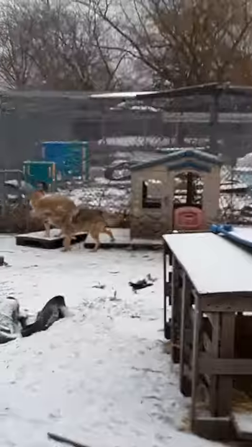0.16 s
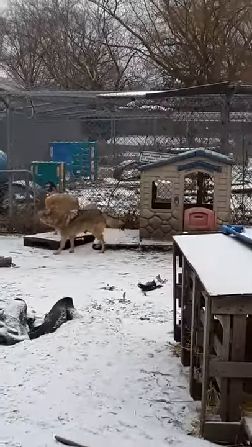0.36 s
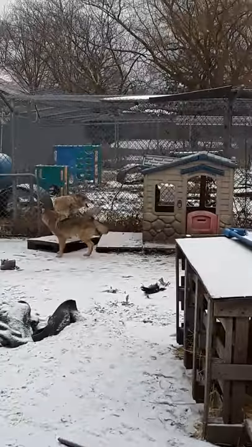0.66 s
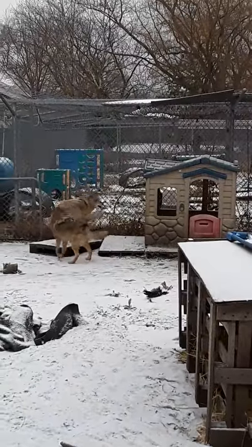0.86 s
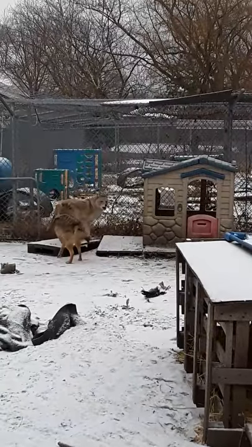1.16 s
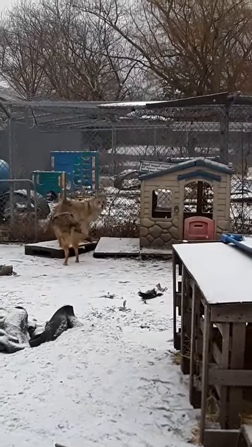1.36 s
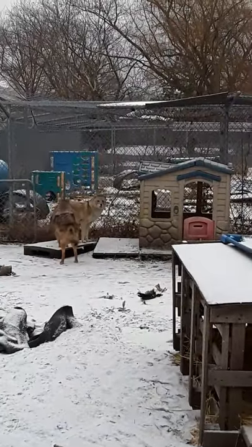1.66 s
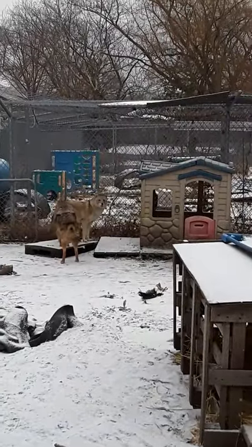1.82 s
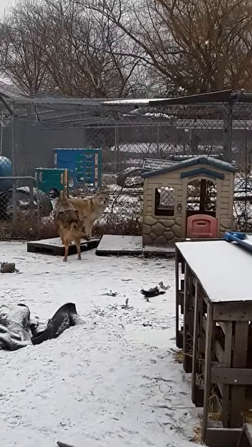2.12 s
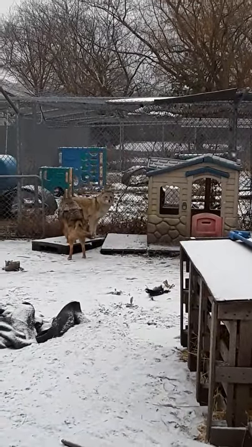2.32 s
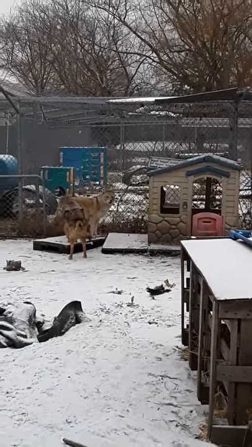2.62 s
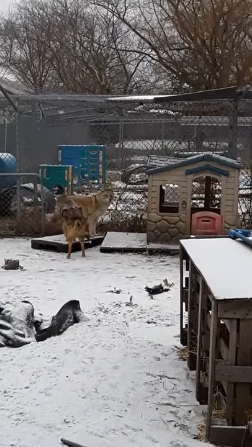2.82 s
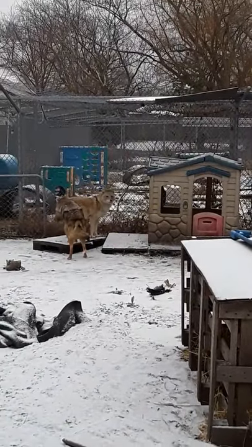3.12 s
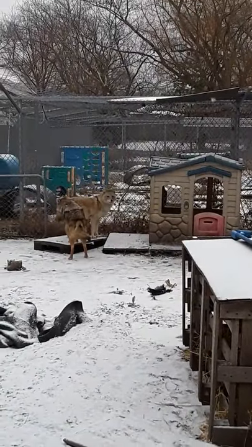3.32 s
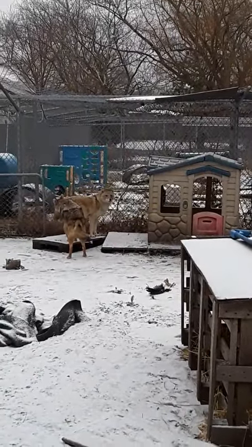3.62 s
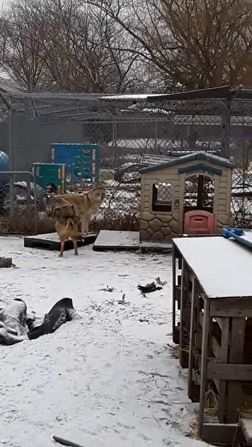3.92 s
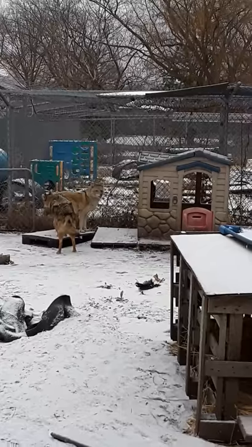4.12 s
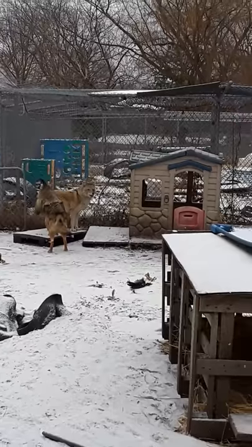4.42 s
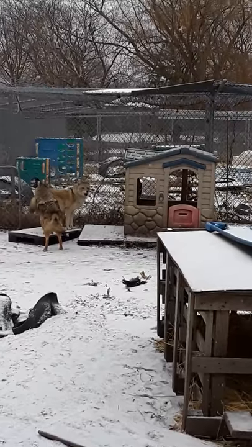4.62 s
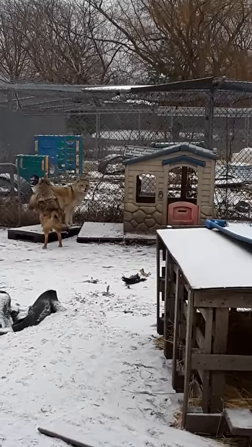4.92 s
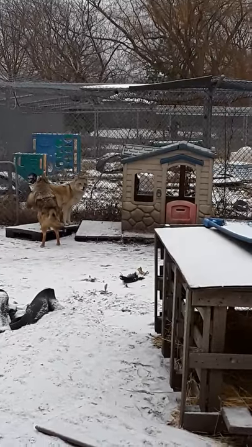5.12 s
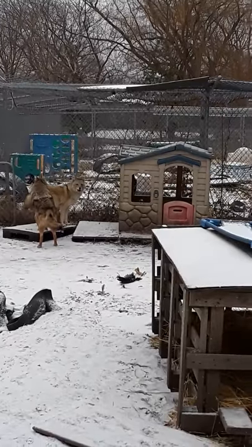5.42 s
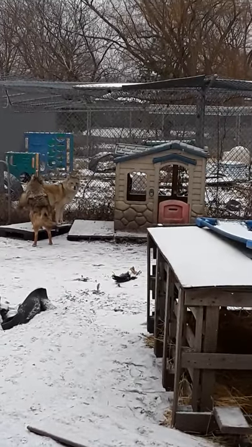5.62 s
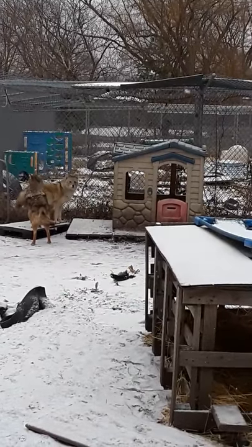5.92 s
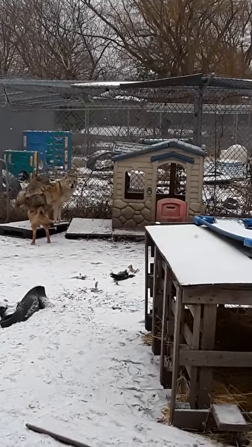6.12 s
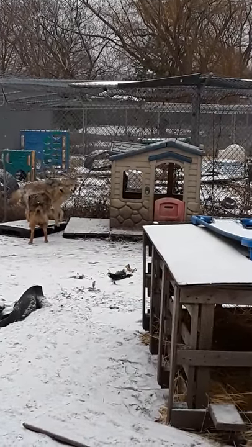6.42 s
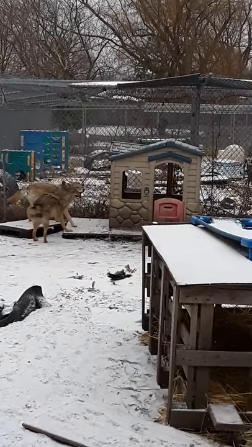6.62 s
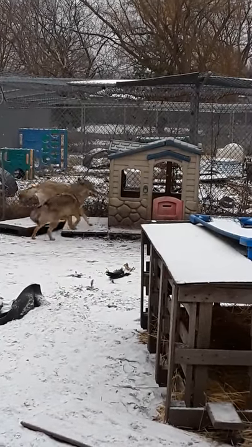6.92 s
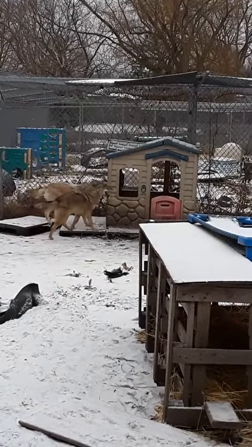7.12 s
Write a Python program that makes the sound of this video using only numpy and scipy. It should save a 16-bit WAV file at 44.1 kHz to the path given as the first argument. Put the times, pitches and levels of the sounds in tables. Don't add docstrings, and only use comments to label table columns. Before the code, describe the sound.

Excited wild canines yelp and whimper over each other outdoors, easing into weak whines before loud climbing yips return, with smeared echo and soft thumps.

```python
import sys
import numpy as np
from scipy import signal
from scipy.fft import rfft, irfft, next_fast_len
from scipy.io import wavfile
from scipy.ndimage import uniform_filter1d, map_coordinates

SR = 44100
rng = np.random.default_rng(int(sys.argv[2]) if len(sys.argv) > 2 else 0)


def bounce(signal):
    frames = np.transpose(np.atleast_2d(signal))
    limited = np.clip(frames, -1, 1)
    pcm = np.round(limited * 32767).astype(np.int16)
    wavfile.write(sys.argv[1], SR, pcm)


def attenuation_scalar(level_db):
    decades = np.asarray(level_db, float) / 20
    return 10 ** decades


N = 320166

# start_s, length_s, first_pitch_hz, last_pitch_hz, fundamental_db
OPEN = [
    (0, 0.037, 813, 792, -29.5),
    (6.01, 0.18, 650, 609.5, -38),
    (6.91, 0.09, 874, 883, -25),
    (7.21, 0.097, 666, 759, -26),
]
SHRILL = [
    (1.085, 0.042, 673, 761.3, -25.5),
    (4.625, 0.035, 914, 1022, -35),
    (5.755, 0.2, 624, 621.5, -52),
]
NASAL = [
    (1.32, 0.12, 822, 827.7, -28.5),
    (2.37, 0.092, 701, 668, -34.5),
]
ROUND = [
    (.11, 0.12, 729, 790.5, -24),
    (1.12, 0.11, 770.6, 860.4, -23.5),
    (1.24, 0.044, 831, 757, -26),
    (1.33, 0.11, 839, 932, -28.5),
    (7.19, 0.1, 1030, 1006, -29.5),
]
YELPS = [
    (2.46, 0.037, 1112, 1010, -39),
    (2.66, .04, 1153, 1060, -35.5),
]
BARKS = [
    (.745, 0.049, 892, 852, -26),
]
RASPS = [
    (.11, 0.094, 715, 807, -48),
    (.82, 0.064, 730, 799, -33),
    (.86, .11, 703, 670, -35.5),
]
PINCHED = [
    (.45, 0.041, 563, 710, -29.5),
    (.93, 0.15, 858, 826, -36.5),
    (2.72, 0.091, 623, 671, -37),
]
CRACKED = [
    (1.115, 0.031, 757, 630, -27),
]
CREAKS = [
    (4.505, .155, 681.7, 677, -25),
]
FAR_ROUND = [
    (.58, 0.18, 662, 648, -37),
    (2.81, 0.065, 633, 725, -33.5),
]
FAR_THIN = [
    (1.55, 0.15, 538.6, 509, -49),
    (1.67, 0.071, 535.6, 637, -37),
    (2.9, 0.16, 662.4, 643, -45.5),
    (3.28, 0.1, 760, 731, -45.5),
    (7.055, 0.095, 591, 700.6, -31),
]
FAR_MOANS = [
    (3.725, .13, 496.4, 500, -47.5),
]
SQUEALS = [
    (2.485, 0.044, 938, 884, -30),
    (2.685, 0.026, 1055, 950, -37.5),
    (5.855, .05, 883, 933, -36),
]


def yips():
    # hz, level_db under the 3rd overtone
    mouth = [(2150, -4), (2600, -13), (3100, -12), (3500, -20), (5000, -53.5)]
    # hz, level_db
    edge = [(3400, 9), (4100, 8), (4900, 0), (6000, -6), (7600, 2.5), (9500, -13.5), (13000, -9),
            (15500, -26)]
    chaos = .04
    spread = 0.076
    out = np.zeros((2, N + SR))
    k = np.arange(1, 19)[:, None]
    for rows, (second_db, third_db, high_db, quality) in calls():
        start, hz, gain = breath(rows, fade=.0095)
        size = len(hz)
        hz = uniform_filter1d(hz, size=400, mode="nearest")
        hoarse, split = np.clip(quality, .02, .95), np.clip(-quality, 0, 3)
        scatter = 0.007 + chaos * hoarse ** 2
        phase = 2 * np.pi * np.cumsum(hz * (1 + scatter * wobble(size, rate_hz=69.15))) / SR
        level = attenuation_scalar(third_db + along(mouth, k * hz) - 3 * (k - 4.5))
        level[:3] = attenuation_scalar([[0], [second_db], [third_db]])
        effort = (gain / gain.max()) ** .5
        patches = attenuation_scalar(6.3 * np.tanh(flutter(len(k), size, rate_hz=30)))
        high = attenuation_scalar(high_db + along(edge, k * hz)) * effort * patches * (k * hz < SR / 2)
        level[3:] += high[3:]
        hidden = np.clip(-np.log10(gain.max() * level.max()) - .6, 0, 1)
        level *= attenuation_scalar(6.85 * hidden * np.tanh(flutter(len(k), size, rate_hz=45)))
        low_share = (hoarse + 0.091 * split) * np.minimum(k / 2, 1)
        high_share = (0.02 + 0.5 * (hoarse + split) + 0.035 * hidden) * np.maximum(k - 4, 0)
        share = np.clip(low_share + high_share, 0, .95)
        turn = k * phase + 2 * np.pi * rng.random(k.shape)
        noise = smear(len(k), size) * np.sin(turn) + smear(len(k), size) * np.cos(turn)
        lines = level * (np.sqrt(1 - share) * np.sin(turn) + np.sqrt(share / 2) * noise)
        half_level = (split + 1.3 * hoarse ** 2) * np.sqrt(level[:6] * level[1:7])
        halves = half_level * np.sin(turn[:6] + phase / 2)
        halves *= 1 + .5 * flutter(len(halves), size, rate_hz=200)
        call = gain * (lines.sum(axis=0) + halves.sum(axis=0))
        lean = np.clip(spread * k[:, 0], 0, .6) * rng.uniform(-0.84, 1, size=len(k))
        side = gain * (lean @ lines)
        for port, late, sign in zip(out, rng.integers(0, 2, size=2), (1, -1)):
            port[start + late:][:size] += call + sign * side
    return out[:, :N]


def calls():
    # calls, (second_db, third_db, high_overtones_db, quality),
    # (attack_s, loss_by_end_db); quality above 0 is the hoarse share, below 0 period doubling
    kinds = [(OPEN, (-6.5, -3.5, -37, 0.33), (0.049, 13)), (SHRILL, (10.5, 5, -32.5, -0.1), (0.02, 8.9)),
             (NASAL, (2.5, -4.5, -45, 0.25), (.038, 8.6)), (ROUND, (-11, -15.5, -39.5, -0.49),
             (.043, 11.7)), (YELPS, (-5.5, -15, -40, -0.1), (0.021, 9.3)), (BARKS, (-6.5, -7.5, -37.5, 0.5),
             (.028, 2)), (RASPS, (3.5, 7, -28.5, 0.53), (.032, 5.6)), (PINCHED, (-2, 6, -38, 0.12),
             (0.029, 6.8)), (CRACKED, (-2.5, 7.5, -31, -0.8), (0.02, 10)),
             (CREAKS, (-6.5, -3.5, -46, -0.94), (0.014, 19)), (FAR_ROUND, (-7, -1.5, -56, 0.32),
             (0.031, 9.3)), (FAR_THIN, (1, 2.5, -50, 0.3), (.042, 5)), (FAR_MOANS, (3, -2, -66, .8),
             (.06, 5)), (SQUEALS, (7, 0.5, -28.5, 0.19), (0.014, 10))]
    # start_s, length_s, pitch_hz, fundamental_db
    dips = [
        (3.491, .06, 829, -34.5),
    ]
    dip_to, dip_ends_db, dip_voice = .96, 8, (10.5, 4, -27, 0.04)
    # (time_s, pitch_hz, fundamental_db)
    phrases = [
        ([(.48, 655, -37), (.505, 655, -32), (.53, 645, -35), (.57, 600, -40)], (-3, 2, -36.5, -1.1)),
        ([(4.45, 492, -34.8), (4.475, 593, -19), (4.51, 722, -31.5)], (-10.5, -9, -56, .12)),
        ([(5.425, 933, -39.5), (5.46, 981, -32), (5.495, 960, -45.5)], (13.5, 8.5, -18, .02)),
        ([(6.0, 728, -41), (6.03, 913, -24), (6.06, 930, -24.5), (6.1, 934, -33.5)], (-1.5, -7.5, -62, .04)),
        ([(6.205, 652, -42), (6.225, 740, -30), (6.245, 800, -17), (6.27, 838, -14), (6.293, 862, -16)], (-.4, -2, -33, .02)),
        ([(6.405, 775, -28), (6.422, 900, -17), (6.44, 1060, -22), (6.47, 1030, -23.5), (6.54, 1015, -24)], (-4, -1.3, -43, .08)),
        ([(7.1, 698, -34), (7.15, 855, -18.5), (7.19, 889, -27)], (-1, -14.5, -40, .1)),
               ([(.29, 940, -33.5), (.33, 946, -28.5), (.37, 953, -45), (.44, 947, -52)], (10.5, -5, -50, -.08)),
        ([(.675, 762, -35), (.71, 795, -19.5), (.75, 859, -23)], (3, -7, -39.5, .15)),
        ([(2.205, 582, -38), (2.23, 682, -25), (2.26, 718, -26.5), (2.36, 704, -36)], (-2.5, -3.5, -48, .14)),
        ([(4.465, 790, -45), (4.485, 770, -26), (4.515, 765, -28), (4.54, 720, -38)], (-2, -12, -35, .1)),
        ([(5.635, 705, -39.5), (5.68, 837, -21), (5.73, 883, -35), (5.76, 867, -58)], (-10.5, -7, -56, .25)),
        ([(6.63, 644, -31), (6.655, 740, -24), (6.685, 785, -22)], (4, 3.5, -40, .12)),
        ([(6.835, 800, -32), (6.865, 870, -23), (6.9, 850, -24), (6.93, 850, -36)], (-3, -1, -33.5, .9)),
               ([(.17, 451.3, -43.5), (.2, 488, -40.5), (.23, 494.5, -39), (.27, 462, -46.5)],
              (3.5, 6, -28.5, 0.2)), ([(.04, 539.5, -50.5), (.075, 677, -41.5), (.11, 693, -43.5)],
              (10.5, 1, -34, 0.3)), ([(4.655, 1025, -38.5), (4.68, 1220, -34.5), (4.71, 1215, -41)],
              (-5.5, -16, -25, 0.66)), ([(.19, 690, -36.5), (.26, 615.7, -31), (.35, 651, -36.5),
              (.44, 690, -39)], (-5.5, -12, -37, 0.1)), ([(1.74, 715, -34), (1.765, 778, -24),
              (1.8, 782, -32)], (4, -4, -33, .12)), ([(2.545, 619.5, -39.5), (2.58, 691, -35),
              (2.62, 705, -35.5), (2.66, 701, -43)], (2.5, 2, -39.5, 0.24)), ([(4.29, 987, -52),
              (4.32, 1034, -44), (4.38, 1079, -52)], (-10, -9.5, -60, 0.5)), ([(5.11, 840, -45),
              (5.13, 815, -42), (5.148, 768, -43), (5.17, 760, -46)], (7, 1, -36, .08)),
              ([(6.84, 692.6, -37), (6.87, 634.5, -31.5), (6.92, 616, -37.5)], (9, 2, -46, 0.4)),
              ([(5.35, 490, -63.5), (5.385, 576, -57.5), (5.43, 561, -50)], (8, -0.5, -60, -0.1)),
              ([(5.5, 561, -46), (5.54, 553, -46), (5.58, 543, -49)], (-11, -14, -58, 0.2)),
               ([(6.678, 800, -27), (6.692, 872, -19), (6.73, 882, -19), (6.77, 890, -34)],
                (-10, -16, -36, -.7)), ([(6.675, 650, -30), (6.692, 735, -26), (6.73, 730, -28),
                (6.77, 725, -38)], (-4, 6, -40, .35)), ([(1.265, 690, -37), (1.3, 785, -30),
                (1.325, 800, -29), (1.35, 810, -39)], (8, 1, -35, -.5)), ([(.845, 1180, -33),
                (.87, 1090, -26), (.915, 930, -28)], (-9, -11, -40, .4)), ([(6.542, 985, -27),
                (6.555, 930, -25), (6.575, 960, -36)], (-4, 0, -50, .15)), ([(3.53, 830, -36),
                (3.542, 925, -34), (3.565, 900, -42)], (5, 0, -25, .45)), ([(5.475, 965, -46),
                (5.49, 960, -42), (5.51, 900, -50)], (6, 2, -14, .7)), ([(2.06, 500, -58), (2.13, 530, -49),
                (2.2, 530, -50)], (0, 2, -60, .12)), ([(4.935, 470, -54), (4.965, 500, -48),
                (5.03, 505, -50), (5.09, 500, -55)], (3, 9, -52, .08)), ([(6.297, 885, -17),
                (6.308, 888, -14), (6.322, 880, -25)], (-13, -20, -40, .08)), ([(6.805, 700, -50),
                (6.832, 760, -33), (6.848, 868, -18), (6.875, 862, -23)], (-4, -12, -45, .15)),
                ([(3.09, 665, -41), (3.12, 700, -35), (3.17, 722, -36), (3.215, 720, -41)],
                (3.5, -3, -58, .12)), ([(3.265, 700, -41), (3.3, 785, -33), (3.35, 800, -35),
                (3.4, 770, -43), (3.455, 780, -47)], (4, -4, -58, .15))]
    # time_s, pitch_hz, fundamental_db
    whine = [
        (3.82, 479, -56),
        (3.88, 503, -43.5),
        (3.93, 561.7, -38.5),
        (4.05, 557.2, -42),
        (4.33, 528, -41),
        (4.39, 492.5, -44),
        (4.44, 413, -46),
    ]
    # second_db, third_db, high_overtones_db, quality
    whine_voice = (-4, -9, -66, .03)
    for rows, voice, (attack, loss_db) in kinds:
        for s, length, first_hz, last_hz, db in rows:
            rise = np.clip(attack, .005, 0.61 * length)
            done = .85 if last_hz > first_hz else rise / length
            start_db = db - 0.5 - 33.5 * max(np.log2(last_hz / first_hz), 0)
            yield [(s, first_hz, start_db),
                   (s + rise, first_hz + done * (last_hz - first_hz), db),
                   (s + length, last_hz, db - loss_db)], voice
    for s, length, hz, db in dips:
        yield [(s, hz, db - dip_ends_db),
               (s + length / 2, dip_to * hz, db),
               (s + length, dip_to * hz, db - dip_ends_db)], dip_voice
    yield from phrases
    yield whine, whine_voice


def breath(rows, fade):
    s, hz, db = np.transpose(rows)
    start = max(int((s[0] - fade) * SR), 0)
    t = np.arange(start, int((s[-1] + fade) * SR)) / SR
    nearest_end = np.minimum(t - s[0], s[-1] - t)
    ends = np.sin(np.pi / 2 * np.clip(nearest_end / (2 * fade) + .5, 0, 1)) ** 2
    return start, np.interp(t, s, hz), attenuation_scalar(np.interp(t, s, db)) * ends * np.sqrt(2)


def smear(count, size):
    return np.vstack([flutter(4, size, rate_hz=420), flutter(count - 4, size, rate_hz=700)])


def whistles():
    out = np.zeros(N + SR)
    for rows, octave_db in whistle_shapes():
        start, hz, gain = breath(rows, fade=0.00085)
        unsteady = 1 + .011 * wobble(len(hz), rate_hz=67)
        smooth_hz = uniform_filter1d(hz, size=500, mode="nearest")
        phase = 2 * np.pi * np.cumsum(smooth_hz * unsteady) / SR
        gain = gain * attenuation_scalar(5.5 * wobble(len(hz), rate_hz=85.0))
        third = attenuation_scalar(-19.0) * np.sin(3 * phase) * (hz < SR / 6)
        out[start:][:len(hz)] += gain * (np.sin(phase) + attenuation_scalar(octave_db) * (np.sin(2 * phase) + third))
    return out[:N]


def whistle_shapes():
    # start_s, length_s, top_pitch_hz, level_db, octave_db
    flicks = [(0.858, .02, 5060, -66, 5), (1.219, 0.018, 4600, -46.5, -7), (2.141, .03, 5530, -65, -17.5),
              (2.653, 0.035, 5340, -57, -4), (4.453, 0.013, 5380, -62, -25), (4.736, 0.017, 4200, -50, -19),
              (5.093, 0.016, 5630, -72, -20), (5.388, 0.027, 5430, -53.5, -29),
              (5.53, 0.012, 4480, -44, -28), (5.842, 0.02, 5200, -59, -6.5), (6.194, 0.012, 5230, -56, -24)]
    # start_s, length_s, top_pitch_hz, level_db, octave_db
    arches = [
        (1.903, 0.06, 4120, -69.5, 4),
        (2.878, 0.135, 5170, -60.5, -6.5),
        (3.66, 0.036, 5010, -89, 11),
        (3.925, .11, 5840, -61.5, -25),
        (5.603, 0.11, 4750, -60.5, -5),
    ]
    # start_s, length_s, top_pitch_hz, level_db, octave_db
    sighs = [
        (4.2, 0.1175, 5740, -63, -31.5),
    ]
    # start_s, length_s, first_hz, last_hz, level_db
    slides = [
        (4.337, 0.046, 6600, 6534, -64),
        (4.661, 0.057, 5380, 4520, -53),
        (2.17, 0.05, 5700, 4400, -64),
        (5.135, .025, 5400, 5350, -61),
        (5.16, .016, 5300, 4850, -61),
        (5.893, .055, 5100, 4800, -57),
        (6.9, 0.044, 5080, 4740, -51),
        (5.757, .08, 6550, 7200, -80),
        (6.356, 0.06, 8060, 8300, -52),
    ]
    # start_s, length_s, first_hz, last_hz, level_db
    hums = [
        (2.25, 0.093, 4400, 4550, -59),
        (2.377, 0.1, 4800, 4830, -67),
        (2.56, 0.096, 4800, 4900, -62),
        (2.74, 0.093, 4600, 4750, -68),
        (3.123, 0.083, 5140, 4970, -65.5),
        (3.292, 0.094, 4820, 4880, -68.5),
    ]
    arch_from, arch_shoulder, arch_to, arch_ends_db = .88, 0.95, .88, 10
    for s, length, hz, db, octave_db in flicks:
        yield [(s, .9 * hz, db - 9), (s + length, hz, db)], octave_db
    for s, length, hz, db, octave_db in arches:
        yield [(s, arch_from * hz, db - arch_ends_db),
               (s + 0.33 * length, arch_shoulder * hz, db - 4.5),
               (s + 0.74 * length, hz, db),
               (s + length, arch_to * hz, db - arch_ends_db)], octave_db
    for s, length, hz, db, octave_db in sighs:
        yield [(s, arch_shoulder ** 2 * hz, db - 6),
               (s + 0.35 * length, hz, db),
               (s + length, arch_to * hz, db - 7.0)], octave_db
    for s, length, first_hz, last_hz, db in slides:
        yield [(s, first_hz, db), (s + length, last_hz, db - 6)], -3.5
    for s, length, first_hz, last_hz, db in hums:
        for detune in (.97, 1, 1.035):
            yield [(s, detune * first_hz, db - 13),
                   (s + length / 3, detune * (first_hz + last_hz) / 2, db - 6),
                   (s + length, detune * last_hz, db - 12)], -40


def echo(x, unlike):
    # hz, decay_s
    yard = [(1200, .8), (3000, .38), (5000, .3), (8000, .25), (12000, .1)]
    out = np.zeros((2, N))
    slot = np.arange(N) / (SR // 4)
    for j in range(3):
        hz, t, z = signal.stft(rng.standard_normal((2, SR)), SR, nperseg=256)
        decay = attenuation_scalar(-60 * t / along(yard, hz)[:, None])
        a, b = signal.istft(z * decay, SR, nperseg=256)[1]
        tail = np.array([a + unlike * b, a - unlike * b]) / np.linalg.norm(a)
        share = np.abs(np.cos(np.pi * (slot - j) / 3)) ** 3
        delayed = np.pad(x * share, (500, 0))[None]
        out += signal.fftconvolve(delayed, tail, axes=1)[:, :N]
    return out


def thumps():
    # start_s, peak_db, pitch_hz
    knocks = [
        (2.059, -27.5, 108.5),
        (3.049, -28.5, 94),
        (3.46, -32, 79),
        (3.579, -39, 68.4),
        (4.509, -28, 205.5),
        (5.098, -33.5, 81),
    ]
    out, t = np.zeros(N + SR), np.arange(SR // 8) / SR
    for s, db, hz in knocks:
        out[round(s * SR):][:len(t)] += attenuation_scalar(db - 60 * t / 0.073) * np.sin(2 * np.pi * hz * t)
    return out[:N]


def background():
    # hz, level_db per Hz
    air = [(15, -44.5), (25, -20), (99, 1.5), (399, -11.5), (648, -2), (1380, -14.5), (1950, -12),
           (2770, -26), (3720, -45.5), (4300, -44.5), (13900, -48), (15500, -51)]
    width = [(30, 0.83), (130, 0.14), (400, 0.24), (1000, 0.33), (8000, 1.0)]  # hz, side share
    mid, side = filtered(rng.standard_normal((2, N)), lambda hz: attenuation_scalar(along(air, hz)))
    side = filtered(side, lambda hz: along(width, hz))
    swell = attenuation_scalar(-44.0 + 0.25 * wobble(N, rate_hz=3.44))
    return swell * unit(np.array([mid + side, mid - side]))


def along(points, hz):
    f, v = np.transpose(points)
    return np.interp(np.log(hz + 1), np.log(f + 1), v)


def unit(x):
    return x / np.sqrt(np.mean(x ** 2) + 1e-20)


def wobble(size, rate_hz):
    knots = rng.standard_normal(int(size * rate_hz / SR) + 4)
    return unit(map_coordinates(knots, [np.arange(size) * rate_hz / SR]))


def flutter(count, size, rate_hz):
    at = np.arange(size) * rate_hz / SR
    knots, i = rng.standard_normal((count, int(at[-1]) + 2)), at.astype(int)
    return (knots[:, i] * (1 - at + i) + knots[:, i + 1] * (at - i)) * np.sqrt(3 / 2)


def filtered(x, response):
    m = next_fast_len(N + SR // 2)
    return irfft(rfft(x, m) * response(np.fft.rfftfreq(m, 1 / SR)), m)[..., :N]


def scene():
    throaty = filtered(yips(), lambda hz: 1 / (1 + (440 / (hz + 1)) ** 10))
    voices = throaty + whistles()
    return attenuation_scalar(0.68) * voices + attenuation_scalar(-13.5) * echo(voices[0], unlike=0.41) + background() + thumps()


def top_cut(x):
    return signal.sosfilt(signal.butter(12, 15710, fs=SR, output="sos"), x)


def record(dry):
    # hz, difference_db
    shade = [(40, 4), (150, 0.5), (400, 1.5), (1200, 4), (2400, -5), (4400, -7), (8000, 4), (15000, 4.5)]
    # hz, lead_radians
    lead = [(300, .1), (950, .5), (1290, -.2), (2900, 1.4), (3600, 4.3), (4600, 4.9), (6000, 6.6),
            (9000, 6.3)]
    port = np.array([[.5], [-.5]])
    wet = filtered(dry, lambda hz: attenuation_scalar(port * along(shade, hz)) * np.exp(1j * port * along(lead, hz)))
    wet = wet / (1 + wet ** 6) ** (1 / 6)
    return top_cut(wet)


dry = scene()
out = record(dry)
bounce(out)
```